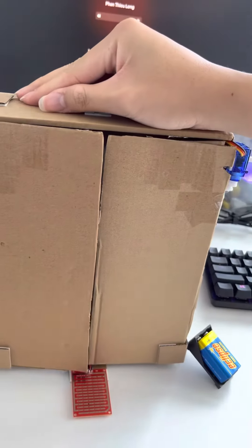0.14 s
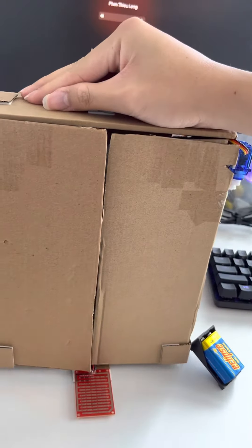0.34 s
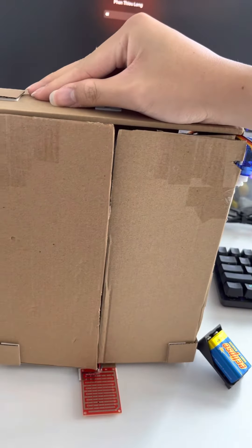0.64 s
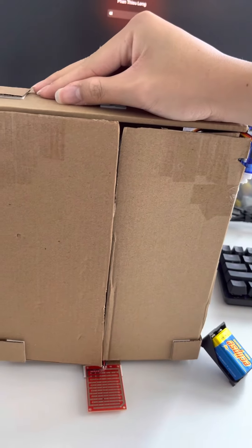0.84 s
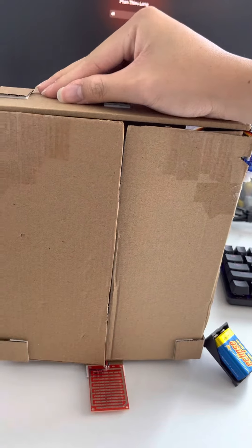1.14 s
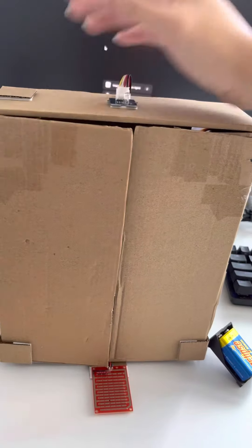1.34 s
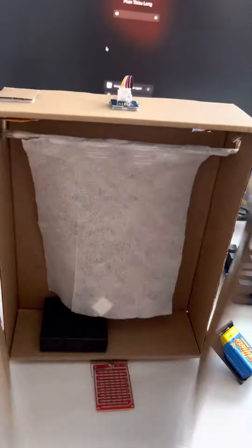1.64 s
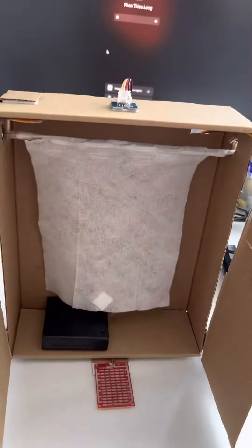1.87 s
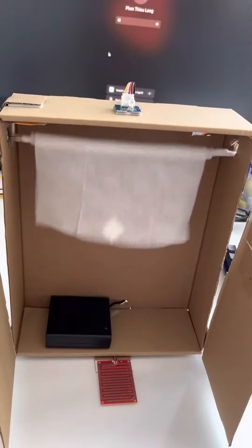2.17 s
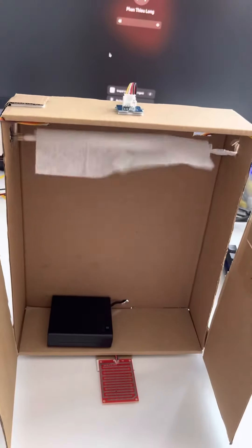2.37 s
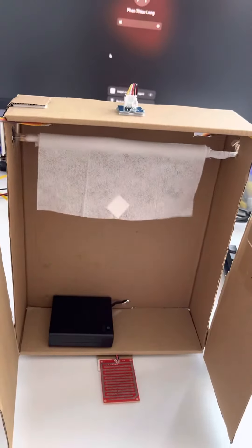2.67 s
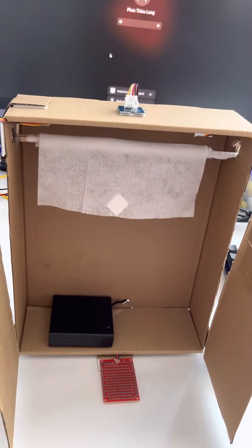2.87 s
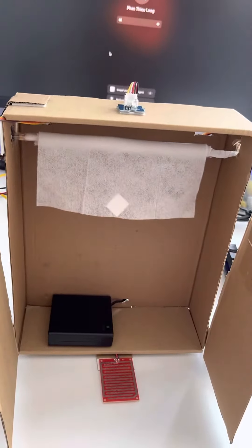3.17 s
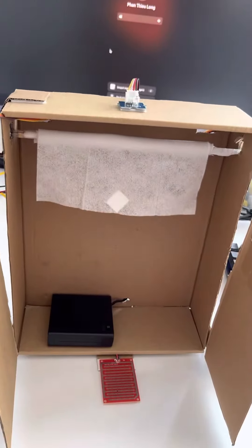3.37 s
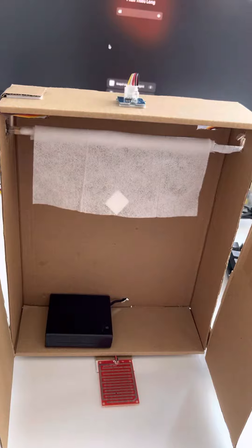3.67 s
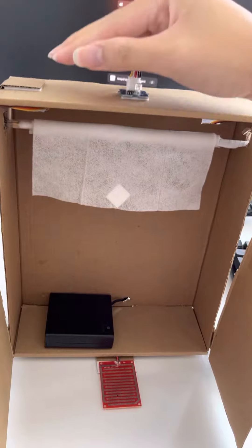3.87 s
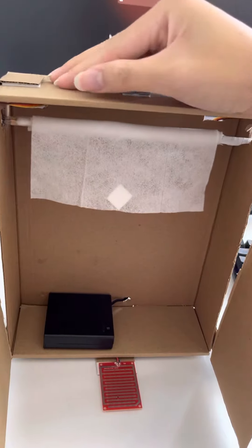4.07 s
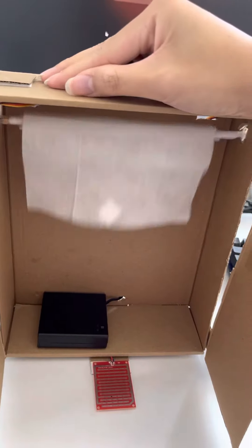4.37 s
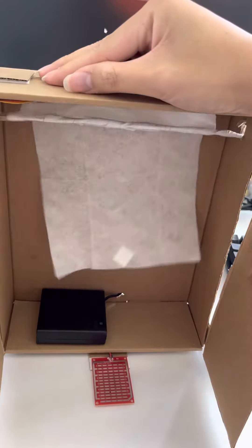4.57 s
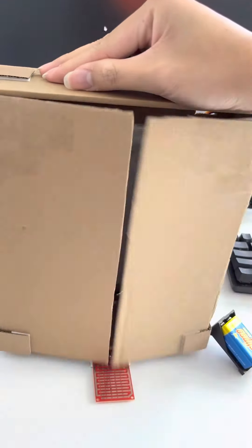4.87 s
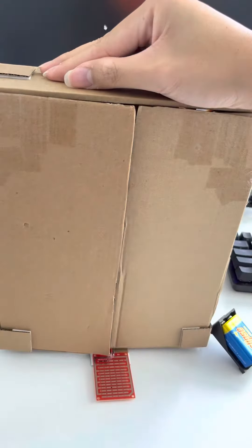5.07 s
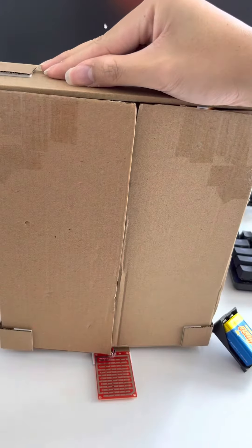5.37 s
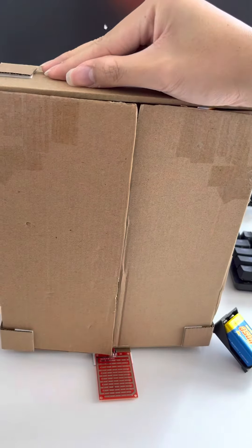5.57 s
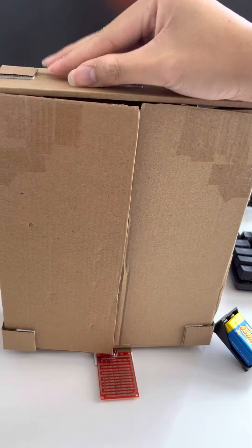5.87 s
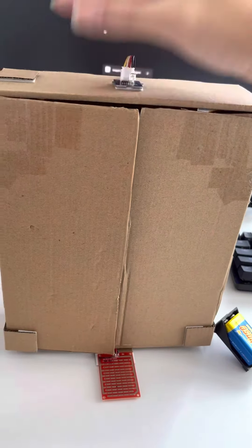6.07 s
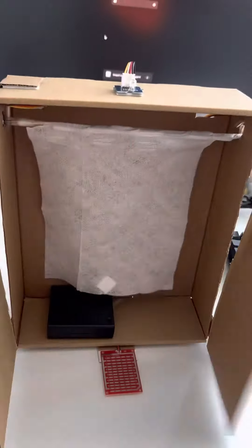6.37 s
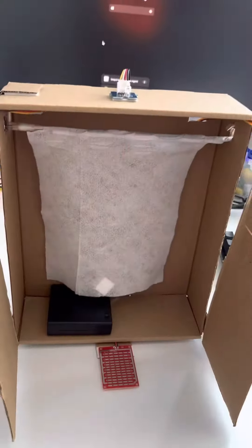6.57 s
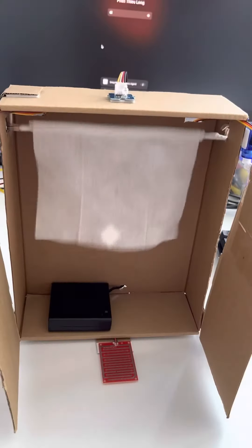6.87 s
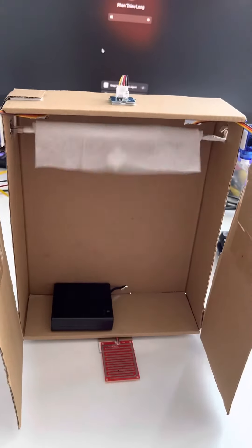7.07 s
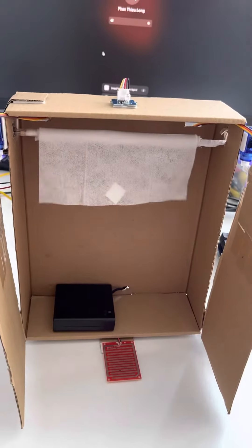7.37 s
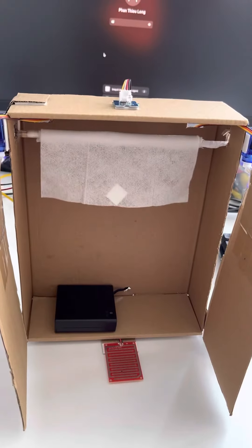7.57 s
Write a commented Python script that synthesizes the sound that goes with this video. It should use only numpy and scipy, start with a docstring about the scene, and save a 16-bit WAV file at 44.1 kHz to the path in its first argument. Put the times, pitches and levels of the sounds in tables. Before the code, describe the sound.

A quiet, small-sounding room with faint low hum, heard close in stereo. From 0 to 1 s fingertips barely tick and knock on cardboard; around 1.1 s the hand brushes off. At 1.36 s two small geared servos rasp, rising in speed then braking, for about 0.3 s, with hollow box bumps and bright snaps at 1.4 to 1.7. Tiny twitch ticks come near 1.8. From 1.85 to 2.3 a steadier mid-pitched whine weakens under load, with three softening paper slaps from 2.1, then a faint papery slip near 2.5. Quiet until soft touches at 4.1. A whine at 4.27 to 4.55 ends amid the loudest cardboard clatter, around 4.45; doors rasp shut at 4.57 to 4.9. Quiet again, then brushing and finger taps at 5.65 to 5.9. Doors rasp open at 6.08, the whine returns at 6.57, slaps from 6.8, paper slips around 7.1 to 7.2, then hush.

```python
"""In a quiet room, close to a pair of microphone ports, fingers knock and brush the lid of a cardboard model on a desk.
Two hobby servos rasp as they swing its doors open; a third whines, winding up a paper curtain.
The rolled hem slaps the box at each turn and the paper slips back. After more brushing the curtain is wound down
and the doors shut; the hand returns, the doors open again and the curtain goes up once more.
Gear teeth are clicks and scrapes, the box is a set of struck modes, and rubbing is made of dense grains."""
import sys
import numpy as np
from scipy import signal
from scipy.fft import rfft, irfft, next_fast_len
from scipy.io import wavfile

SR = 44100
rng = np.random.default_rng(int(sys.argv[2]) if len(sys.argv) > 2 else 0)


def bounce(signal):
    """Save signal as a 16-bit WAV file at the path given by the first command-line argument."""
    frames = np.transpose(np.atleast_2d(signal))
    limited = np.clip(frames, -1, 1)
    pcm = np.round(limited * 32767).astype(np.int16)
    wavfile.write(sys.argv[1], SR, pcm)


N = 340883
T = np.arange(N) / SR

# All levels in the tables are relative: each layer's gains, the room and the ports act on them.
# Blows on the box from rod, doors and fingers. Each row: time in seconds, level in dB, crack in dB.
BLOWS = [(0.169, -62, -7.5), (0.313, -56.5, -13.5), (0.488, -59, -15), (0.597, -64, -11),
         (0.831, -57, -10.5), (0.976, -55.5, -20), (1.102, -46.5, -23), (1.135, -40, -7), (1.164, -44, -10),
         (1.209, -49.5, -4.5), (1.274, -48, -28), (1.476, -34, -9), (1.651, -26, -11.5),
         (1.749, -44, -14.5), (1.887, -35.5, -12), (2.006, -33.5, -10), (4.033, -51, -9.5),
         (4.125, -54, -6), (4.198, -56, -8.5), (4.35, -24, -9.5), (4.386, -19.5, -9.5), (4.405, -16, -12),
         (4.42, -18.5, -10), (4.447, -11.5, -2), (4.621, -40, -14), (4.804, -34, -7), (4.884, -36.5, -8.5),
         (5.619, -58.5, -15), (5.675, -49, -8.5), (5.826, -50, -18), (5.863, -38.5, 0.5),
         (5.896, -42.5, -6.5), (6.185, -33, -8.5), (6.345, -29, -11), (6.391, -38.5, -16),
         (6.618, -35, -30), (6.657, -34.5, -17), (6.723, -32.5, -11)]
# Doors held open by twitching servos. Each row: first twitch in seconds, tick in dB, hinge murmur in dB.
DOOR_HOLDS = [(1.7844, -42.5, -53), (6.4966, -44.5, -53)]
# Colour of a bright tick, also of the hem's hiss. Each row: frequency in Hz, density in dB per Hz.
TICK_COLOUR = [(300, -17), (1500, -4), (3500, 1), (8000, 1), (12000, -2), (16000, -8.5)]


def amp(db):
    """Decibels to gain."""
    return 10 ** (np.asarray(db) / 20)


def unit(x):
    """Scales to rms 1."""
    return x / np.sqrt(np.mean(x ** 2) + 1e-20)


def read(points, hz):
    """Reads a table along a log-frequency axis."""
    f, value = np.transpose(points)
    return np.interp(np.log(hz + 1), np.log(f + 1), value)


def add(mix, s, sound):
    """Lays a sound into the mix at a time in seconds."""
    part = mix[round(s * SR):][:len(sound)]
    part += sound[:len(part)]


def colour(x, spectrum):
    """Passes x through a causal, minimum-phase filter with the given spectrum."""
    size = 4096
    log_gain = np.log(amp(read(spectrum, abs(np.fft.fftfreq(size, 1 / SR)))))
    response = np.fft.ifft(np.exp(np.conj(signal.hilbert(log_gain)))).real
    return signal.oaconvolve(x, response[:size // 2])[:len(x)]


def band(x, lo_hz, hi_hz):
    """Keeps the band between two frequencies."""
    edges = [lo_hz, min(hi_hz, SR / 2 - 1)]
    return signal.sosfilt(signal.butter(3, edges, "band", fs=SR, output="sos"), x)


def ring(x, hz, width):
    """One resonance of gain 1 at its peak."""
    return signal.lfilter(*signal.iirpeak(hz, hz / width, fs=SR), x)


def drift(hz):
    """Random wandering of rms 1, with rates up to hz."""
    step = 16  # samples between the computed points
    size = next_fast_len(N // step + 1)
    spectrum = rfft(rng.standard_normal(size)) * (np.fft.rfftfreq(size, step / SR) < hz)
    slow = irfft(spectrum, size)
    return unit(np.interp(np.arange(N) / step, np.arange(size), slow))


def grains(per_s, spread_db):
    """Random clicks of either sign, their sizes spread by spread_db."""
    size = amp(spread_db * np.minimum(rng.exponential(1, N), 4)) * rng.choice([-1, 1], N)
    return unit(size * (rng.random(N) < per_s / SR))


def gears(turns, teeth, scrape, lumpy):
    """Each tooth lands with a click and then scrapes; an off-centre wheel presses harder once a turn."""
    mesh = turns * teeth
    clicks = np.diff(np.floor(mesh), prepend=0) * (1 + .5 * rng.standard_normal(N))
    sliding = np.exp(-(mesh % 1) / .5) * rng.standard_normal(N)
    pressure = 1 + lumpy * np.cos(2 * np.pi * turns)
    return unit((unit(clicks) + scrape * unit(sliding)) * pressure)


def burst(start, length, attack, trend_db, release_db):
    """Gain of a run: a soft attack, a hold that drifts by trend_db per s, a release of release_db per s."""
    age = np.maximum(T - start, 0)
    onset = (1 - np.exp(-age / attack)) ** 1.3
    return onset * amp(trend_db * np.minimum(age, length) - release_db * np.maximum(age - length, 0))


def strokes(rows, rise_db, fall_db):
    """Gain of rubbing strokes: each swells by rise_db to its strongest moment, then dies away by fall_db."""
    total = np.zeros(N)
    for start, top, end, db in rows:
        levels = [db - rise_db, db, db - fall_db]
        total += amp(np.interp(T, [start, top, end], levels, left=-200, right=-200))
    return total


def since(rows):
    """Seconds since the latest run began, 0 ahead of the first."""
    starts = np.array([row[0] for row in rows])
    latest = np.maximum(np.searchsorted(starts, T) - 1, 0)
    return np.maximum(T - starts[latest], 0)


def snaps(rows, spectrum, t60, rise):
    """Short dry snaps of decaying noise, all of one colour."""
    out, t = np.zeros(N), np.arange(SR // 20) / SR
    for (s, db), noise in zip(rows, rng.standard_normal((len(rows), len(t)))):
        add(out, s, noise * amp(db - 60 * t / t60) * (1 - np.exp(-t / rise)))
    return colour(out, spectrum)


def background():
    """Low room noise, alike at both ports in the bass only, and a faint wavering hum."""
    # Colour of the room air. Each row: frequency in Hz, density in dB per Hz.
    air_colour = [(20, -9.5), (50, 3.5), (100, 1.5), (160, -6.5), (240, 2), (300, -7.5), (450, -8),
                  (620, -18), (800, -20), (1300, -28.5), (2000, -33), (4500, -38), (8000, -42.5),
                  (14700, -48.5)]
    # Hum tones. Each row: mean frequency in Hz, mean level in dB.
    hum_tones = [(100, -79), (237, -77.5)]
    air_db = -69
    common = unit(colour(rng.standard_normal(N), air_colour))
    apart = unit(colour(rng.standard_normal(N), air_colour))
    apart = colour(apart, [(60, -19.5), (200, -9.0), (400, 0.5), (1500, 1.5)])
    hum = np.zeros(N)
    for hz, db in hum_tones:
        level = amp(db + 2.5 * drift(10.0))
        turns = np.cumsum(hz + 1.1 * drift(10)) / SR
        hum += level * unit(np.sin(2 * np.pi * turns))
    return amp(air_db) * np.array([common + apart, common - apart]) + hum


def rubbing():
    """Paper slipping back and skin brushing the lid catch and let go in tiny, dense grains."""
    # The curtain slipping back. Each row: start, strongest moment and end in seconds, level in dB.
    slip_rows = [(2.365, 2.394, 2.51, -65), (2.42, 2.518, 2.568, -61), (7.085, 7.102, 7.135, -59),
                 (7.12, 7.204, 7.26, -60.5)]
    # The hand on the lid. Each row: start, strongest moment and end in seconds, level in dB.
    brush_rows = [(1.085, 1.165, 1.21, -58), (1.21, 1.258, 1.3, -70), (4.12, 4.15, 4.7, -85),
                  (5.665, 5.735, 5.8, -69.5), (5.82, 5.865, 5.95, -61.5)]
    # Colours of paper and skin. Each row: frequency in Hz, density in dB per Hz.
    paper_colour = [(60, -3.5), (250, 0.5), (450, -0.5), (620, -3.5), (1100, 0), (1600, -1), (4000, -15),
                    (7500, -12.5), (11500, -12.5), (14700, -22)]
    skin_colour = [(60, -17), (170, -4), (280, -18), (450, 3.5), (620, -11.5), (1100, -16), (2400, -21),
                   (3400, -20.5), (5000, -25), (9000, -31.5), (14700, -30.5)]
    paper = unit(colour(grains(per_s=1900, spread_db=-1.0), paper_colour))
    paper = paper * strokes(slip_rows, rise_db=15.5, fall_db=16.5) * amp(5.0)
    skin = colour(grains(per_s=2500, spread_db=4.5), skin_colour)
    skin = skin / np.std(band(skin, 3600, 15000))  # the brush levels refer to this band
    return paper + skin * strokes(brush_rows, rise_db=17.5, fall_db=26.5)


def hinges():
    """Tape hinges flex in small slips and the door panels murmur as the open doors sway."""
    # Colour of the swaying doors. Each row: frequency in Hz, density in dB per Hz.
    hinge_colour = [(60, -8), (170, 3.5), (280, -2), (450, 4.5), (600, -5.5), (780, -4.5), (1200, -21.5),
                    (3000, -23.5), (15000, -44.5)]
    lead_s, sway_s = .06, .14  # the doors sway from just before the first twitch
    sway = sum(amp(db) * burst(s - lead_s, sway_s, attack=.005, trend_db=2.5, release_db=606)
               for s, _, db in DOOR_HOLDS)
    return unit(colour(grains(per_s=2400, spread_db=0.0), hinge_colour)) * sway * amp(-6)


def slaps(count=3):
    """The rolled hem's blows, one a turn of the rod, each softer and duller: (s, level dB, crack dB)."""
    # Each row: first slap in seconds, its level in dB, seconds per turn.
    slap_rows = [(2.0924, -18.5, .074), (6.812, -19, .0745)]
    crack_db, fade_db, dull_db = -4.5, 2.5, 1.5  # the first slap's crack; level and crack lost per turn
    return [(s + k * turn_s, db - k * fade_db, crack_db - k * dull_db)
            for s, db, turn_s in slap_rows for k in range(count)]


def swishes():
    """The paper hem hisses past around each slap, as noise under a bell-shaped gain."""
    swish_db, half_width_s = -51.5, 0.0066
    passing = sum(np.exp(-.5 * ((T - s) / half_width_s) ** 2) for s, _, _ in slaps())
    return unit(colour(rng.standard_normal(N), TICK_COLOUR)) * passing * amp(swish_db)


def wobbles(t60=0.28):
    """After some of the blows the whole box wobbles on the desk: low, uneven shudders that sink in pitch."""
    # Each row: time in seconds, level in dB, reference pitch in Hz (it sinks from 1.23 to 0.61 times this).
    wobble_rows = [(1.482, -48, 124), (1.661, -41, 112.6), (4.447, -35.5, 76), (4.806, -46, 108.5),
                   (6.191, -51.5, 142), (6.356, -48.5, 113.4)]
    out, t = np.zeros(N), np.arange(SR // 3) / SR
    for s, db, hz in wobble_rows:
        pitch = hz * (0.61 + 0.62 * np.exp(-t / 0.031))
        sway = np.sin(2 * np.pi * np.cumsum(pitch) / SR)
        add(out, s, amp(db - 60 * t / t60) * (1 - np.exp(-t / 0.0012)) * sway)
    return out * (1 + .55 * drift(35))


def cracks(t60=0.034):
    """Each blow also crushes cardboard fibres for a few milliseconds, a burst of noise scaled to the blow."""
    # Colour of crushed fibres. Each row: frequency in Hz, density in dB per Hz.
    crack_colour = [(200, -13), (700, -0.5), (1500, 1), (2400, 0.5), (3500, -11.5), (6000, -26),
                    (15000, -33.5)]
    out, t, blows = np.zeros(N), np.arange(SR // 12) / SR, slaps() + BLOWS
    for (s, db, crack_db), noise in zip(blows, rng.standard_normal((len(blows), len(t)))):
        level = amp(db + crack_db + 0.5 - 60 * t / t60)
        add(out, s - .001, noise * level * (1 - np.exp(-t / 0.00094)))
    return colour(out, crack_colour)


def knocks(travel=.0036, rise=.0018, spot_db=2):
    """Blows ring the modes of the box; bending waves carry the treble faster, so each knock falls in pitch."""
    # Modes of the box. Each row: nominal frequency in Hz, level in dB, t60 in seconds.
    box_modes = [(61, -30, .25), (125, -29, .12), (155.64, -12, 0.16), (191, -7.5, 0.02),
                 (299, -16.5, 0.048), (391.3, -8.5, 0.046), (457.5, 3, 0.054), (465.7, -13.5, 0.09),
                 (712, -13, 0.047), (762, -13.5, .035), (950.5, 2, 0.025), (1087, 1.5, 0.025),
                 (1360, 4.5, 0.018), (1510.4, -4.5, 0.035), (1640, -8, .022), (1950, -13.5, .012),
                 (2000, -9, 0.044)]
    slap_boom_db = 3  # the hem hits the big back panel, which booms more
    out, t = np.zeros(N), np.arange(SR // 4) / SR
    blows = [(*row, slap_boom_db) for row in slaps()] + [(*row, 0) for row in BLOWS]
    chances = rng.standard_normal((len(blows), len(box_modes), 2))
    for (s, db, crack_db, panel_db), luck in zip(blows, chances):
        body = 0
        boom_db = -5.5 + panel_db - 0.17 * db - .15 * crack_db  # soft or dull blows boom relatively more
        tilt = [(200, boom_db), (400, 0.00031), (600, 0), (1100, 2.1 * crack_db + 7.0)]  # (Hz, dB)
        for k, (hz, mode_db, t60) in enumerate(box_modes):
            slowness = np.sqrt(1000 / hz)
            age = np.maximum(t - travel * (slowness - .7) * min(hz / 400, 1), 0)
            spot = luck[k] * min(hz / 1000, 1)  # the upper modes depend on where the blow lands
            swell = 1 - np.exp(-age / (rise * slowness))
            decay = amp(mode_db + read(tilt, hz) + spot_db * spot[0] - 60 * age / t60)
            tone = np.sin(2 * np.pi * hz * (1 + 0.017 * spot[1]) * age)
            body = body + (-1) ** k * decay * swell * tone
        add(out, s - .001, amp(db + 1.0) * body / abs(body).max())
    return out


def ticks(count=4):
    """Gear teeth, tape and twitching servos snap brightly; fingertips catch with a duller tick."""
    # Gear teeth and tape. Each row: time in seconds, level in dB.
    tick_rows = [(1.0825, -52.5), (1.1611, -41), (1.4104, -24), (1.4671, -23.5), (1.8459, -36.5),
                 (1.8851, -25), (2.002, -34), (4.0294, -58.5), (4.3366, -40), (4.363, -33), (4.3935, -28.5),
                 (4.4428, -27.5), (4.4477, -29), (4.4604, -33), (5.863, -41), (6.6166, -33.5),
                 (6.6567, -20.5)]
    # Fingertips catching on the lid. Each row: time in seconds, level in dB.
    catch_rows = [(0.0676, -69.5), (0.2399, -74), (0.4239, -72), (0.828, -73.5), (1.049, -68),
                  (1.137, -48.5), (4.127, -66), (5.674, -51), (5.7001, -47.5), (5.7193, -58), (5.8952, -52)]
    # Colour of a fingertip catch. Each row: frequency in Hz, density in dB per Hz.
    catch_colour = [(300, -16), (1500, -5), (2400, -4), (3300, 6.5), (4500, -10), (7000, -19), (15000, -27)]
    pulse_s = .02  # a holding servo twitches once per control pulse
    twitches = [(s + k * pulse_s, db) for s, db, _ in DOOR_HOLDS for k in range(count)]
    bright = snaps(tick_rows + twitches, TICK_COLOUR, t60=0.02, rise=0.00088) * amp(-1.0)
    dull = snaps(catch_rows, catch_colour, t60=0.02, rise=0.00065) * amp(12.5)
    return bright + dull


def curtain_servo():
    """A nearly steady whine of harmonics loses level as the paper loads it, over a soft whir of gears."""
    # Runs up, down, up. Each row: start in seconds, length in seconds, whine in dB, whine lost under full
    # load in dB, gear whir in dB (3.5-14 kHz), whir trend in dB per second.
    wind_rows = [(1.849, 0.44, -38.5, 9, -60.5, -16.5), (4.267, 0.29, -40.5, 0.5, -60.5, -9),
                 (6.571, .44, -38.5, 10, -59.5, -17.5)]
    # Whine. Each row: harmonic number, mean level in dB.
    whine_harmonics = [(1, -3.5), (2, -20), (3, -20), (4, -30.5), (6, -35)]
    # Colour of the whir. Each row: frequency in Hz, density in dB per Hz.
    whir_colour = [(40, -17.5), (160, 0), (280, -8.5), (400, -5.5), (600, -9), (750, -8), (1200, -15.5),
                   (1700, -13.5), (2500, -20), (4000, -24), (11500, -26), (14700, -35)]
    start_hz, settled_hz, settle_s, load_s = 485, 485.3, .06, .2  # the load builds more slowly than the pitch
    age = since(wind_rows)
    hz = settled_hz + (start_hz - settled_hz) * np.exp(-age / settle_s)
    load = np.minimum(age / load_s, 1) ** 2
    turns = np.cumsum(hz * (1 + .005 * drift(120))) / SR
    whine = np.zeros(N)
    for k, db in whine_harmonics:
        tone = np.sin(2 * np.pi * (k * turns + rng.random()))
        whine += amp(db + .8 * k * drift(70)) * unit(tone)
    whir = colour(gears(turns, teeth=1.8, scrape=6.7, lumpy=0.2), whir_colour)
    whir = whir / np.std(band(whir, 3500, 14000))
    singing, meshing = np.zeros(N), np.zeros(N)
    for s, length, whine_db, lost_db, whir_db, trend in wind_rows:
        singing += amp(whine_db - lost_db * load) * burst(s, length, attack=0.0065, trend_db=4.5, release_db=484.5)
        meshing += amp(whir_db) * burst(s, length, attack=0.014, trend_db=trend, release_db=352)
    return whine * singing + whir * meshing


def door_servo(share, servo_db, hum_db):
    """A gear train, at its share of the full speed, rasps in its case and buzzes its door panel; its shaft hums."""
    # Open, shut, open. Each row: start in seconds, seconds under drive, gear rasp in dB, panel buzz in dB.
    swing_rows = [(1.363, 0.27, -40, -49), (4.568, 0.27, -40, -51.5), (6.076, 0.25, -39.5, -48.5)]
    # Gliding gear tones. Each row: multiple of the shaft speed, mean level in dB against the panel buzz.
    gear_orders = [(3.2, -14), (3.5, -13), (3.75, -15), (4.5, -16)]
    # Gear cases on cardboard. Each row: frequency in Hz, density in dB per Hz.
    rasp_colour = [(40, -19), (160, 0.5), (240, -13), (450, 1), (620, -1.5), (1050, -7), (2100, -9.5),
                   (3100, -15), (3800, -20), (5300, -1.5), (7000, -4.5), (9300, -16.5), (11500, -10.5),
                   (14700, -14.5)]
    # Rings of the gear case. Each row: frequency in Hz, width in Hz, mean level in dB against the rasp.
    case_rings = [(1040, 320, -19.5), (3594, 180, -18), (4182, 390, -17), (4827, 690, -9.5),
                  (6370, 560, -13.5), (7650, 70, -22), (7986, 140, -17.5), (8630, 200, -18.5)]
    # full speed in turns per s: a spin-up from start to top, then braking back down to the start speed
    start_hz, top_hz, spin_up_s, brake_after_s, brake_hz_per_s = 170.55, 327.5, .07, .225, 550
    # a short nudge ends each swing; its level in dB against the gear rasp
    nudge_after_s, nudge_s, nudge_db = .312, 0.016, -1
    hum_steepness = 3.5  # the shaft hum grows with this power of the speed
    age = since(swing_rows)
    speed = top_hz - (top_hz - start_hz) * np.exp(-age / spin_up_s)
    speed = speed - brake_hz_per_s * np.maximum(age - brake_after_s, 0)
    speed = np.maximum(speed, start_hz)
    shaft = np.cumsum(speed * share * (1 + 0.009 * drift(60))) / SR

    drive, nudge, buzz = np.zeros(N), np.zeros(N), np.zeros(N)
    for s, length, rasp_db, buzz_db in swing_rows:
        drive += amp(rasp_db) * burst(s, length, attack=0.024, trend_db=6.5, release_db=256.5)
        push = burst(s + nudge_after_s, nudge_s, attack=0.015, trend_db=-20, release_db=420)
        nudge += amp(rasp_db + nudge_db) * push
        buzz += amp(buzz_db) * burst(s, length, attack=0.025, trend_db=10.5, release_db=330.5)

    teeth = gears(shaft, teeth=4.5, scrape=1.4, lumpy=.45)
    teeth = unit(teeth * amp(1.5 * drift(200) + 1.1 * drift(35)))
    rasp = colour(teeth, rasp_colour)
    # the load shifts from wheel to wheel, so each ring of the case flares and fades
    flares = sum(amp(db + 4.96 * drift(13)) * unit(ring(teeth, hz, width)) for hz, width, db in case_rings)
    bright_rasp = unit(colour(rasp, [(1500, -22.5), (3000, -1.5), (9000, -1), (13000, 0.0)]))
    case = (bright_rasp + flares) * np.hypot(drive, nudge)
    panel = unit(colour(rasp, [(1800, 4), (3200, -31.0)])) * amp(1)
    tones = sum(amp(db + 3 * drift(30)) * unit(np.sin(2 * np.pi * order * shaft)) for order, db in gear_orders)
    hum = amp(hum_db) * (speed / top_hz) ** hum_steepness * np.sin(2 * np.pi * shaft)
    return (case + hum * drive + (panel + tones) * buzz) * amp(servo_db)


def room(x, wet_db=-11):
    """Dense reflections from desk and walls, each band dying at its own speed."""
    # Each row: frequency in Hz, t60 in seconds.
    room_decay = [(100, 0.57), (500, 0.31), (2000, 0.17), (8000, 0.17), (16000, 0.21)]
    t = np.arange(SR // 2) / SR
    taps = rng.standard_normal(len(t)) * np.clip((t - .004) / 0.00092, 0, 1)
    hz, age, z = signal.stft(taps, SR, nperseg=256)
    fading = amp(-60 * age / read(room_decay, hz)[:, None])
    tail = signal.istft(z * fading, SR, nperseg=256)[1]
    return x + amp(wet_db) * signal.oaconvolve(x, tail / np.linalg.norm(tail))[:N]


def ports(x, scatter_t60=0.13):
    """Two ports hear the box with a phase lead, unlike levels and a share of sound scattered by the desk."""
    # Each row: frequency in Hz, radians by which the left port leads.
    lead_points = [(160, -.05), (300, -.3), (700, -1.4), (950, -.5), (1200, -.7), (2050, 0), (2900, 3.1),
                   (4100, .3), (5750, 3.14), (6250, 3.14), (8400, 6.2), (9800, 6.4), (11800, 9.42),
                   (13050, 9.42), (14600, 12.5)]
    # Each row: frequency in Hz, left minus right level in dB.
    side_points = [(150, .3), (420, 2.8), (560, 2.5), (820, -4.5), (1100, 1), (1370, -3), (1700, 0),
                   (2900, -3.5), (4300, 0)]
    # Each row: frequency in Hz, likeness of the two ports from 0 to 1.
    alike_points = [(100, .99), (1900, .96), (2700, .5), (4200, .45), (5700, 1), (6300, 1), (7500, .85),
                    (9000, .98), (10800, .88), (11700, 1), (13100, 1), (14000, .85)]
    size, t = next_fast_len(N + SR // 4), np.arange(SR // 4) / SR
    hz, z = np.fft.rfftfreq(size, 1 / SR), rfft(x, size)
    alike = np.clip(read(alike_points, hz), 0, 1)
    side_db, lead = read(side_points, hz), read(lead_points, hz)
    echoes = rng.standard_normal(len(t)) * amp(-60 * t / scatter_t60)
    scattered = np.sqrt((1 - alike) / 2) * rfft(echoes / np.linalg.norm(echoes), size)
    direct = np.sqrt((1 + alike) / 2)
    pair = []
    for way in (1, -1):  # left, right
        path = (direct + way * scattered) * amp(way * side_db / 2) * np.exp(way * 1j * lead / 2)
        pair.append(irfft(z * path, size)[:N])
    return np.array(pair)


def scene():
    """Both door servos, the curtain servo with the ticks, and the cardboard reach the ports by separate paths."""
    # The two door servos. Each row: share of the full speed, level in dB, shaft hum in dB against the rasp.
    servo_rows = [(0.99, -3, -8), (.93, -3.5, -22)]
    cardboard = hinges() + knocks() + cracks() + wobbles() + rubbing() + swishes()
    sources = [door_servo(*row) for row in servo_rows] + [curtain_servo() + ticks(), cardboard]
    return sum(ports(room(source)) for source in sources) + background()


def record(dry):
    """The recorder's band limit, a steep low-pass."""
    edge_hz = 15900
    low_pass = signal.firwin(511, edge_hz, window=("kaiser", 9), fs=SR)
    return signal.oaconvolve(dry, low_pass[None], "same")


dry = scene()
out = record(dry)
bounce(out)
```